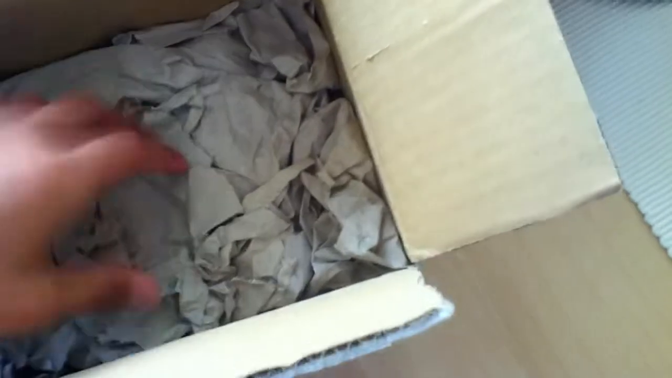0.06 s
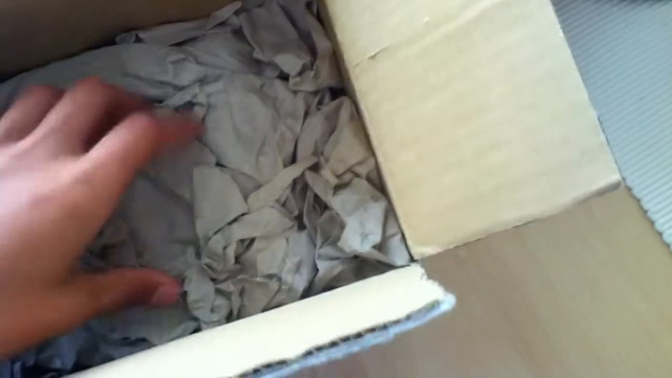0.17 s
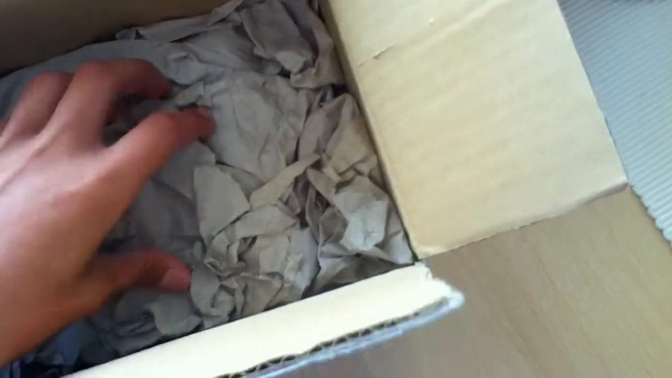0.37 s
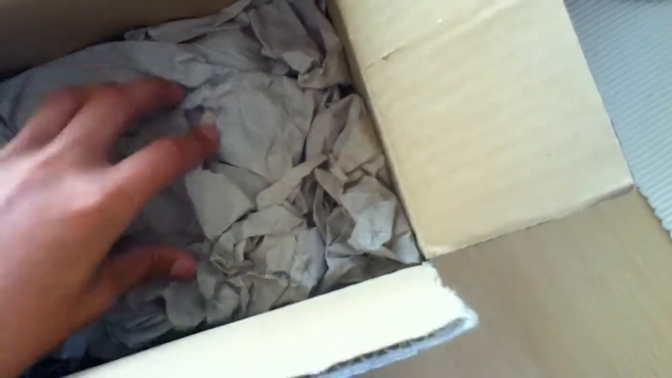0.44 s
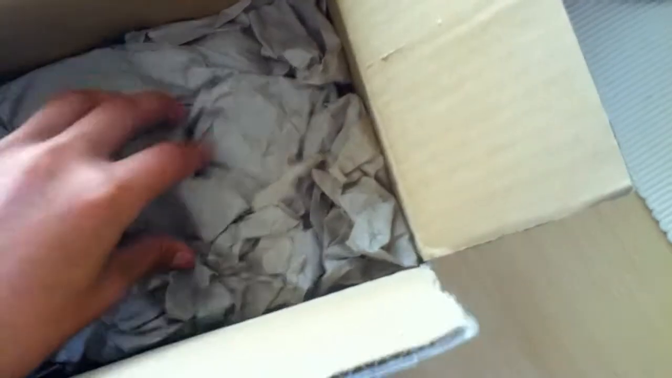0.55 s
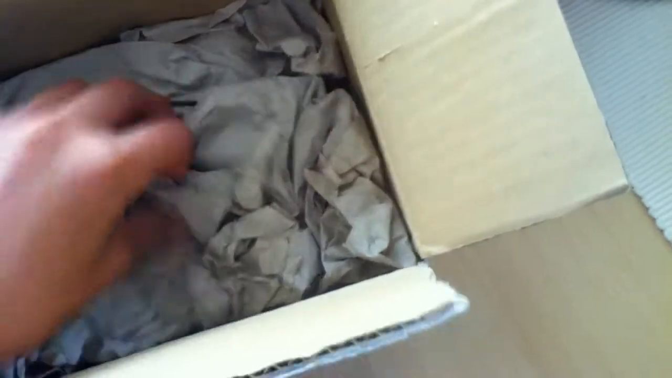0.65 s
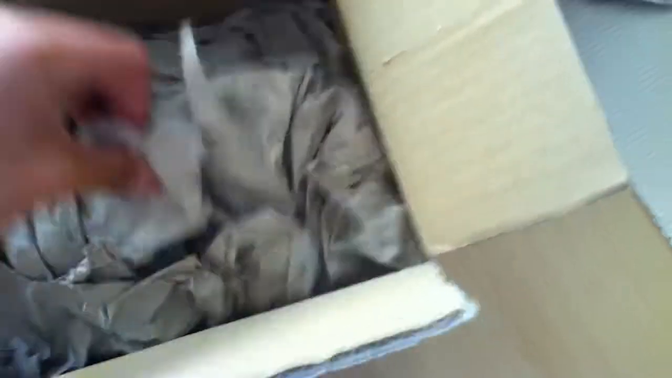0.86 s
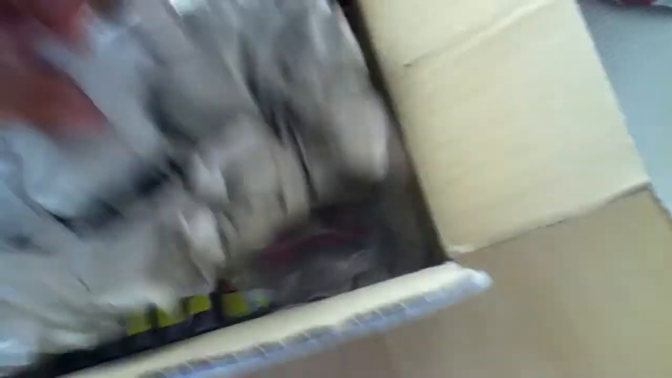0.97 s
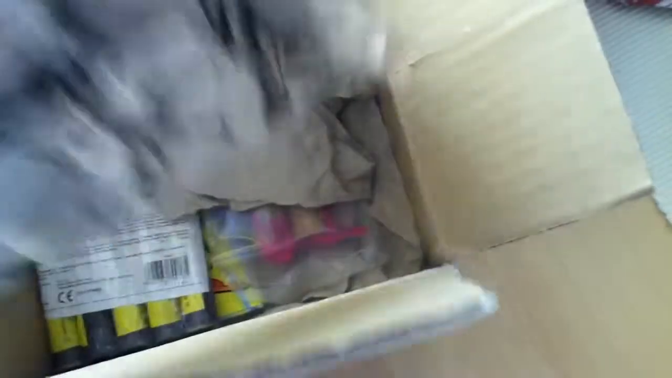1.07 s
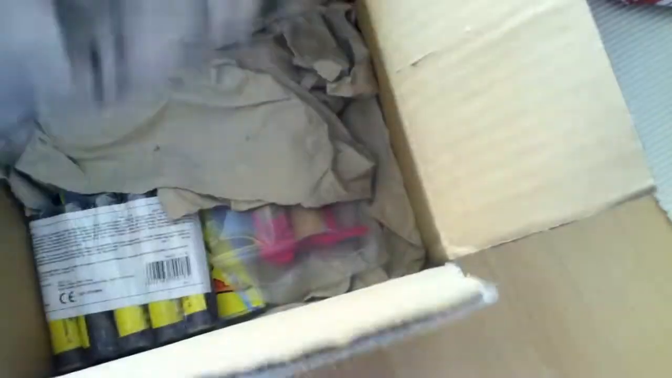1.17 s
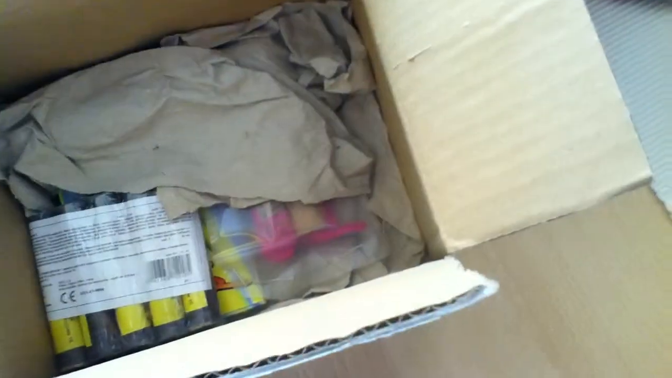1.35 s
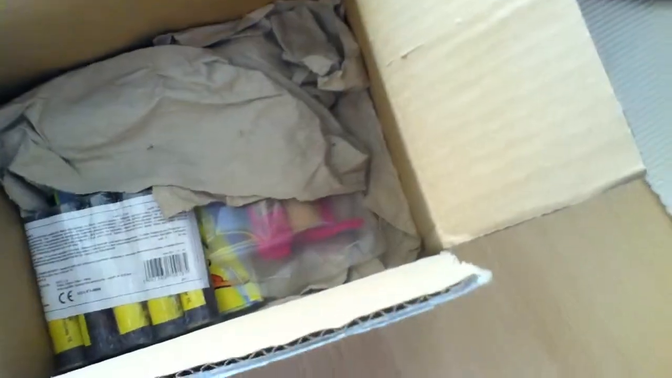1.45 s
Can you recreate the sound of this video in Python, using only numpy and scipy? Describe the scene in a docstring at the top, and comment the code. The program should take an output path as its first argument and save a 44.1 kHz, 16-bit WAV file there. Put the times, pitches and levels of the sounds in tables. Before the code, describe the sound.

Stiff packing paper crinkles softly, then crackles loudly as it is pulled out of a carton

```python
"""Crumpled kraft paper rustles hollowly in a gripping hand, then is pulled out of a cardboard box, close by
in a small quiet room. Countless tiny creases ring for a cycle or two over the hiss of sliding sheets;
fingers knock the hollow wad, larger folds snap as sharp pulses with a crackle, and sheets scrape in short slips.
The box rings on its modes when bumped as the wad comes free, then the paper left inside settles.
Dense decaying reflections give the carton and the room; shaped noise gives the quiet air."""
import sys
import numpy as np
from scipy import signal
from scipy.fft import rfft, irfft
from scipy.io import wavfile

SR = 44100
rng = np.random.default_rng(int(sys.argv[2]) if len(sys.argv) > 2 else 0)


def transcribe(signal):
    """Save signal, clipped to [-1, 1], as a 16-bit WAV file at the path in sys.argv[1]."""
    frames = np.atleast_2d(signal).T
    limited = np.clip(frames, -1, 1)
    pcm = np.round(limited * 32767).astype(np.int16)
    wavfile.write(sys.argv[1], SR, pcm)


N = 66150


def undb(db):
    """Decibels to gain."""
    return 10 ** (np.asarray(db) / 20)


def unit(x):
    """Scale to an rms of one."""
    return x / np.sqrt(np.mean(x ** 2) + 1e-18)


def add(out, start_s, sound):
    """Mix a sound in at a time."""
    i = max(int(start_s * SR), 0)
    out[i:i + len(sound)] += sound[:max(len(out) - i, 0)]


def colour(x, points):
    """Filter by an outline of f/Hz, level/dB, falling steadily beyond its ends; rms one."""
    hz, db = np.array(points, float).T
    log_hz = np.log(hz)
    log_f = np.log(np.arange(N // 2 + 1) * SR / N + 1)
    outside = np.maximum(log_hz[0] - log_f, 0) + np.maximum(log_f - log_hz[-1], 0)
    gain = undb(np.interp(log_f, log_hz, db) - 20 * outside)
    return unit(irfft(rfft(x) * gain, N))


def wander(rate_hz):
    """Smooth random unevenness, a new value at the given rate; rms one."""
    step = max(int(SR / rate_hz), 1)
    return unit(np.interp(np.arange(N) / step, np.arange(1000), rng.standard_normal(1000)))


def room_air():
    """The quiet room at the microphone: steady noise, mostly deep."""
    # outline of the room's noise: f/Hz, density/dB per Hz
    air_outline = [(25, 12), (55, -19), (100, -2), (170, -6.5), (300, -26), (600, -8.5), (1200, -44),
                   (4000, -19.5), (16000, -25.5)]
    level_db = -55.5
    return undb(level_db) * colour(rng.standard_normal(N), air_outline)


def crinkle(lo_hz, hi_hz):
    """Tiny creases giving way, each a ring of a cycle or two at its own pitch, over the hiss of sliding."""
    creases_per_s, spread_db, max_db = 1500, 1, 10
    ring_cycles = 1.8
    slide_share = .45  # of the power
    creases = np.zeros(N)
    t = np.arange(SR // 100) / SR
    hiss = rng.standard_normal(N)
    draws = rng.random(size=(8000, 4))
    for when, pitch, strength, phase in draws[:int(creases_per_s * N / SR)]:
        hz = lo_hz * (hi_hz / lo_hz) ** pitch
        db = min(-spread_db * np.log(1 - strength), max_db)  # a few creases stand out
        ring = np.sin(2 * np.pi * (hz * t + phase)) * np.exp(-2 * hz * t / ring_cycles)
        add(creases, when * N / SR, undb(db) * hz * ring)
    return np.sqrt(1 - slide_share) * unit(creases) + np.sqrt(slide_share) * hiss


def rustle():
    """The wad crinkles in three ranges as it is gripped and pulled in little jerks, and drags on the box walls."""
    # loudness of the moving wad before the trims: t/s, hollow body level/dB, middle level/dB, treble level/dB
    rustle_levels = [(0, -41, -48, -46.5), (0.049, -47.5, -52.5, -50), (0.079, -45, -46.5, -42),
                     (.12, -53.5, -57, -54.5), (0.169, -49.5, -47.5, -57), (0.213, -54, -61, -53),
                     (.25, -50, -54.5, -37.5), (.335, -44, -41, -40), (.395, -52, -51.5, -47),
                     (.46, -46.5, -46, -36), (.525, -46, -50, -40), (.56, -46, -42, -35),
                     (.635, -43.5, -45, -33), (.66, -30, -32.5, -29), (.72, -39, -36, -28.5),
                     (0.784, -36.5, -31, -24.5), (0.809, -45.5, -39, -37), (.87, -43, -41, -34.5),
                     (.91, -37.5, -34, -31), (0.974, -29.5, -31.5, -27.5), (1.02, -48.5, -36.5, -30.5),
                     (1.101, -46.5, -45.5, -39), (1.136, -54, -53, -52), (1.17, -57.5, -54, -46.5),
                     (1.255, -67, -65.5, -63), (1.30, -62, -59, -54.5), (1.34, -68, -63, -67.5),
                     (1.5, -68, -65, -60)]
    # colours of the three ranges of paper: f/Hz, density/dB per Hz
    body_outline = [(130, -28), (200, -2), (255, -0.5), (340, -0.5), (420, 1), (520, 1.5), (640, 2.5),
                    (850, 2.5), (1300, 4.5)]
    middle_outline = [(550, -11), (900, -3), (1130, -6), (1330, -2.5), (1650, 2.5), (2300, 4.5), (2900, -1),
                      (4500, -2)]
    treble_outline = [(1900, -17), (3100, -1.5), (4200, -0.5), (5500, -1.5), (7500, -1.5), (10000, -4),
                      (12500, -8), (16000, -15.5)]
    # box walls rumbling as the paper drags on them: f/Hz, density/dB per Hz
    drag_outline = [(25, -20), (55, -11), (95, 2), (135, -1.5), (185, -6), (300, -2.5)]
    body_trim_db, middle_trim_db, treble_trim_db = -3, -1, -2.5
    flutter_hz, flutter_db = 70.66, 1.5
    drag_db, drag_follows = -56, 0.44  # drag moves by this share of the body's dB swing
    t = np.arange(N) / SR
    times, *levels = np.array(rustle_levels).T
    body, middle, treble = (np.interp(t, times, db) for db in levels)
    paper = undb(body + body_trim_db) * colour(crinkle(210, 1073), body_outline)
    paper += undb(middle + middle_trim_db) * colour(crinkle(820, 3700), middle_outline)
    paper += undb(treble + treble_trim_db) * colour(crinkle(2380, 14200), treble_outline)
    drag_level = drag_db + drag_follows * (body - body.mean())
    drag = undb(drag_level) * colour(rng.standard_normal(N), drag_outline)
    return paper * undb(flutter_db * wander(flutter_hz)) + drag


def echoes(x, t60):
    """Dense reflections that die away, the first after 1.5 ms."""
    t = np.arange(SR // 2) / SR
    tail = rng.standard_normal(len(t)) * np.exp(-np.log(1000) * t / t60) * (t > .0015)
    return signal.fftconvolve(x, tail / np.linalg.norm(tail))[:N]


def knocks(events, modes, push_s):
    """Soft pushes ring the modes of a hollow thing, a little differently each time."""
    detune_spread = 0.036
    out, t = np.zeros(N), np.arange(SR // 4) / SR
    for start, db in events:
        detune = 1 + detune_spread * rng.standard_normal(len(modes))
        ring = np.zeros(len(t))
        for (hz, level, t60), d in zip(modes, detune):
            decay = np.exp(-np.log(1000) * t / t60)
            ring += undb(level) * np.sin(2 * np.pi * hz * d * t) * decay
        ring = ring * (1 - np.exp(-t / push_s))
        add(out, start, undb(db) * ring / np.abs(ring).max())
    return out


def thuds():
    """Fingers knock the hollow wad, which rings briefly on its modes."""
    # finger knocks: t/s, peak level/dB
    thud_events = [(.006, -41.5), (.030, -38), (.134, -39), (.158, -39), (.302, -38.5), (.370, -34),
                   (.476, -36), (.543, -31.5), (.590, -32.5), (.646, -24), (.665, -31.5), (.704, -28.5),
                   (.776, -34)]
    # modes of the wad: f/Hz, level/dB, t60/s
    wad_modes = [(263, -4, 0.04), (335.5, -0.5, 0.13), (362.6, 0.5, 0.092), (512.6, 2, 0.065),
                 (599, 3.5, 0.043), (815, -22, 0.0083)]
    return knocks(thud_events, wad_modes, push_s=0.0014)


def snaps():
    """A fold pops through: a sharp pulse, its treble first, and a brief crackle, ringing the facet around it."""
    # folds: t/s, pulse peak level/dB, centre f/Hz, width over centre, upper edge f/Hz, crackle decay/s
    snap_events = [ (.1297, -15.5, 5470, 1.4, 8800, 0.0027), (.1300, -25.5, 1100, 0.98, 2490, 0.0044),
                   (0.1643, -25, 3430, 1.5, 8800, .0014), (.2085, -35, 2600, 1.3, 7000, .002),
                   (.2380, -33, 714, 0.2, 990, 0.0022), (.2383, -15, 4550, 0.56, 8200, 0.002),
                   (.2390, -25, 2000, 0.053, 3000, 0.0025), (.3490, -20, 6000, 2, 15000, .0012),
                   (.3563, -25, 8000, 1.5, 15000, .0008), (.3690, -13, 4000, 1.5, 14000, .0006),
                   (.3693, -15, 700, 1.2, 1300, .0012), (.4780, -31.5, 1230, 0.61, 4000, .003),
                   (0.5548, -21, 3840, 0.27, 8000, 0.0028), (0.587, -20, 5950, 0.63, 10000, 0.0014),
                   (.6068, -20, 4950, 1.7, 9000, .001), (.6183, -12.5, 4200, 1.8, 9000, .0012),
                   (.6475, -14, 1500, 2, 6000, .0018), (.6510, -11, 6000, 1.5, 10000, .0016),
                   (.6660, -10.5, 2600, 2, 6500, .0018), (.6853, -10.5, 2200, 1.3, 7000, .0014),
                   (.7090, -20, 2400, 1.4, 8000, 0.00059), (0.7194, -12.5, 4470, 1.4, 8000, 0.00084),
                   (.7232, -24, 3500, 0.86, 8000, 0.00084), (0.7636, -11.5, 3670, 0.67, 10100, 0.0007),
                   (.7727, -3.5, 5600, .6, 9000, .0008), (.9255, -6.5, 1900, .27, 2700, .0016),
                   (.9270, -8, 4700, .9, 6000, .001), (.9590, -7, 2600, .6, 4500, .0012),
                   (.9802, -5.5, 2200, 1.3, 6000, .0009), (1.1485, -27, 3800, .35, 5000, .0015),
                   (.8380, -18, 4500, 0.52, 8000, .0014), (0.849, -17, 4000, 2.2, 8000, 0.0013),
                   (.8890, -25, 6000, 0.54, 9000, 0.0034), (0.9015, -14, 4000, 1.2, 8000, .002),
                   (.9245, -21, 584, 0.4, 1010, 0.00081), (1.0250, -21, 2470, 0.5, 6000, 0.0024),
                   (1.0490, -26, 2600, 0.44, 7000, .0015), (1.1117, -26.5, 795, 1.4, 4000, 0.006),
                   (1.2057, -37, 2400, 1, 5000, 0.0016), (1.3645, -45, 3600, 0.53, 7000, .0015),
                   (1.4793, -35, 3750, 2.5, 9000, 0.0022)]
    crackle_db, crackle_rise_s = -1.5, 0.00044  # level against the pulse
    flex_s = .0004  # bending-wave delay at 1 kHz, longer below and shorter above
    out, size = np.zeros(N), 2048
    t = np.arange(size) / SR
    f = np.arange(size // 2 + 1) * SR / size + 1
    bending = np.exp(-4j * np.pi * flex_s * np.sqrt(f * 1000))
    for start, db, hz, width, edge_hz, decay in snap_events:
        resonance = 1 / (1 + 1j * (f / hz - hz / f) / width)
        facet = bending * resonance / np.sqrt(1 + (f / edge_hz) ** 6)
        pulse = irfft(facet)
        burst = rng.standard_normal(size) * np.exp(-t / decay) * (1 - np.exp(-t / crackle_rise_s))
        crackle = unit(irfft(facet * rfft(burst))) * pulse.std() * undb(crackle_db)
        add(out, start, undb(db) * (pulse + crackle) / np.abs(pulse).max())
    return out


def scrapes():
    """Short slips of sheet on sheet: attack, hold, release."""
    # slips: t/s, length/s, level/dB
    slip_events = [(.133, .033, -37), (.238, .026, -38), (.280, .027, -39), (.355, .012, -35),
                   (.685, .006, -29), (.7595, .012, -21), (.965, .018, -28)]
    # colour of sheet on sheet: f/Hz, density/dB per Hz
    slip_outline = [(150, -26), (350, 6.5), (1000, 2), (2500, 2), (5500, 2.5), (8500, 4), (12000, -0.5),
                    (16000, -18)]
    attack_s, release_s = .003, .003
    t = np.arange(N) / SR
    push = np.zeros(N)
    for start, length, db in slip_events:
        attack = np.clip((t - start) / attack_s, 0, 1)
        release = np.exp(-np.maximum(t - start - length, 0) / release_s)
        push += undb(db) * attack * release
    return push * colour(crinkle(1400, 14600), slip_outline)


def bumps():
    """The cardboard box is bumped and its modes ring low and short."""
    # bumps on the box: t/s, peak level/dB
    bump_events = [(.165, -43), (.237, -48), (.370, -61), (.592, -45), (.652, -49), (.774, -25),
                   (0.914, -55), (.968, -41), (1.108, -40)]
    # modes of the box: f/Hz, level/dB, t60/s
    box_modes = [(86, -21, 0.081), (103.5, -0.5, 0.11), (132, 1, 0.13), (270, -1.5, 0.088)]
    return knocks(bump_events, box_modes, push_s=0.0021)


def scene():
    """Paper close by, reflected by the carton and the room, with the knocks and the room's air."""
    carton_t60_s, carton_db = 0.027, -13.5
    room_t60_s, room_db = .3, -16
    near = rustle() + snaps() + scrapes()
    carton = undb(carton_db) * echoes(near, carton_t60_s)
    room = undb(room_db) * echoes(near, room_t60_s)
    hollow = thuds() + bumps()
    return (near + carton + room + hollow + room_air())[None]


def record(dry):
    """The recorder thins the deepest bass and cuts the top steeply."""
    low_cut_hz, top_hz = 60, 15800
    low_cut = signal.butter(2, low_cut_hz, "high", fs=SR, output="sos")
    top_cut = signal.ellip(10, .2, 70, top_hz, fs=SR, output="sos")
    return signal.sosfilt(top_cut, signal.sosfilt(low_cut, dry))


dry = scene()
out = record(dry)
transcribe(out)
```